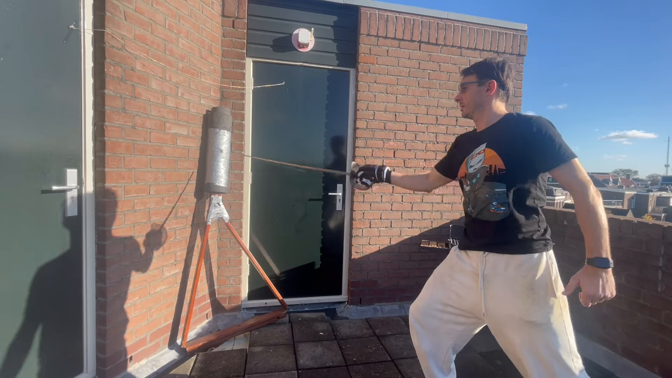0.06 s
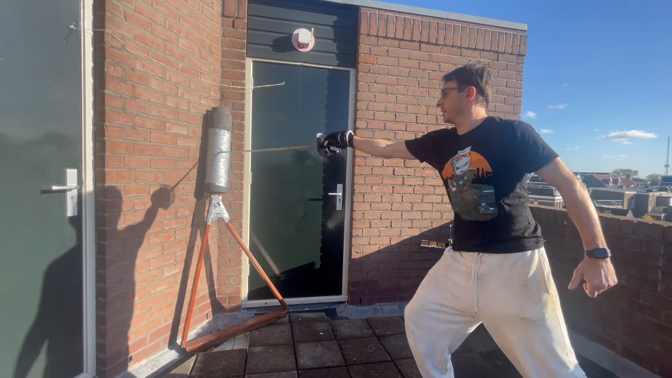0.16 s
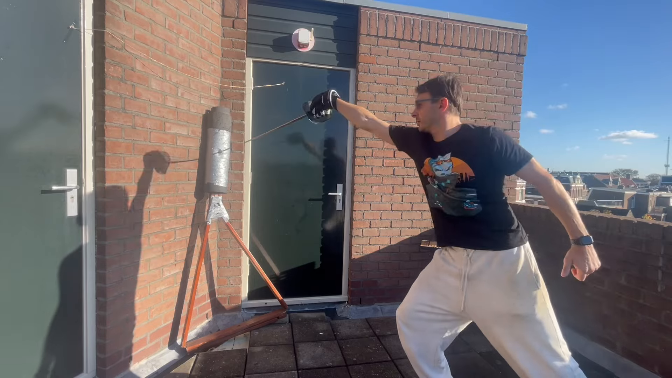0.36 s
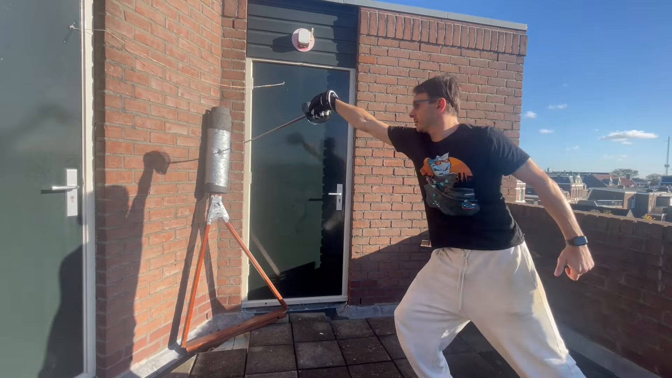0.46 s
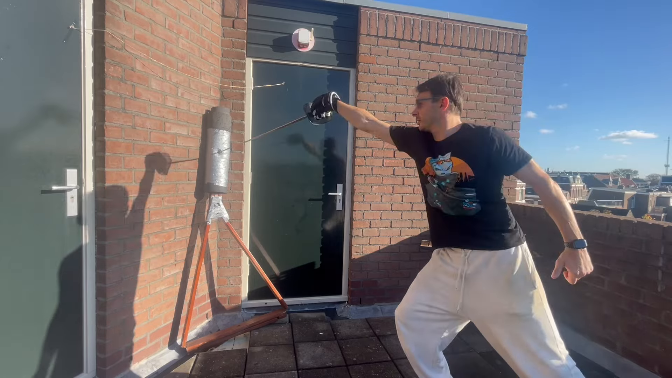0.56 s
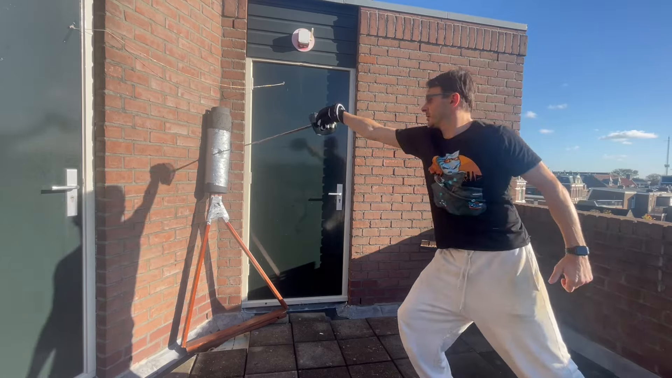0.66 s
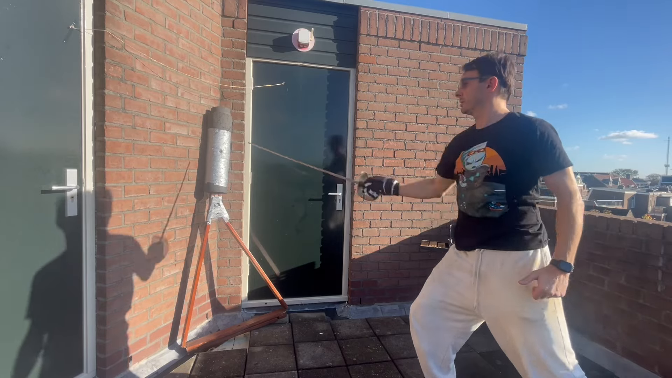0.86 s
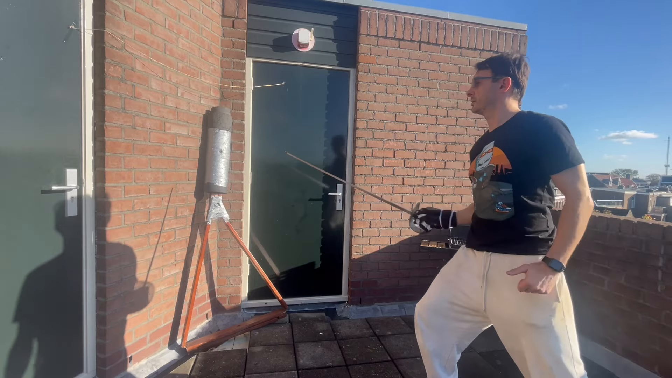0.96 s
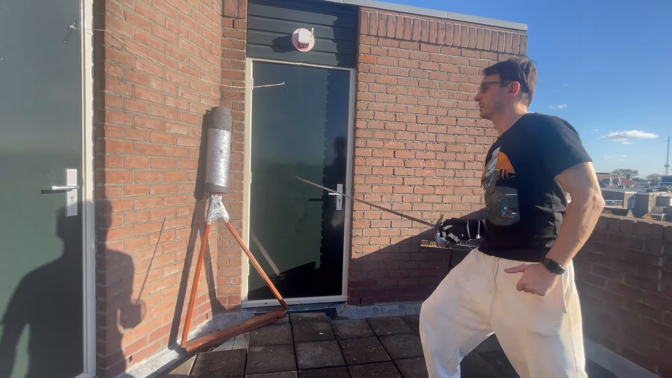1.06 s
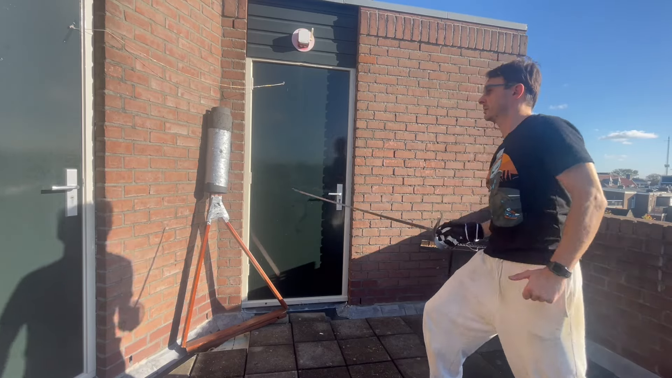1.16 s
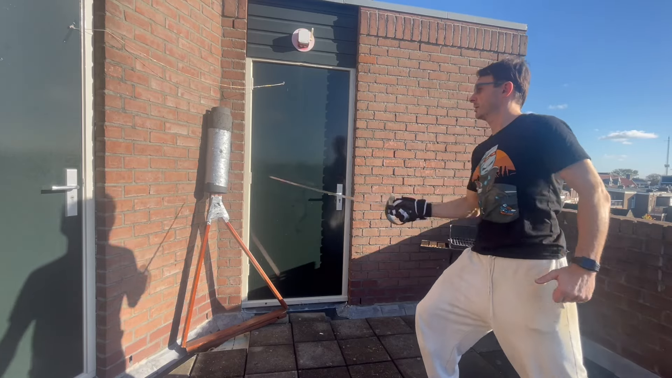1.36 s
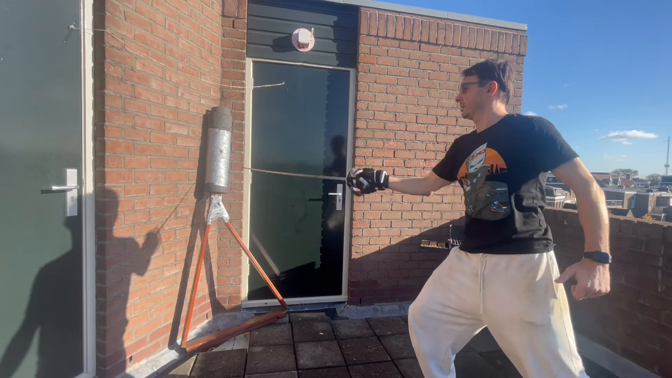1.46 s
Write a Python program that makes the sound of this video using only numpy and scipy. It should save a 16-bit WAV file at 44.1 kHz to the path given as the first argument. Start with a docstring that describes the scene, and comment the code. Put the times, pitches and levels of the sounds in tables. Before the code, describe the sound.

A blade tip knocks hard once into a padded post, with a short rattle, outdoors

```python
"""City rumble and thin electric tones lie under everything: shaped noise, a wavering low drone and sines.
Cloth rustles as the arm goes out and returns: grainy noise with short scuffs, ticks and whistles.
A blade tip is thrust once into a padded post on a wooden stand, on a brick-walled roof terrace: a soft
touch, a hard knock and a rattle, made of decaying modes and noise, with an echo of fading noise.
Two microphone ports take it in with differing phase and level."""
import sys
import numpy as np
from scipy import signal
from scipy.fft import rfft, irfft, next_fast_len
from scipy.io import wavfile
from scipy.ndimage import uniform_filter1d, map_coordinates

SR = 44100
rng = np.random.default_rng(int(sys.argv[2]) if len(sys.argv) > 2 else 0)


def generate_wav(sig):
    """Save sig (samples, or channels by samples) to the path in sys.argv[1] as 16-bit PCM at SR."""
    pcm = np.round(np.clip(np.atleast_2d(sig).T, -1, 1) * 32767).astype(np.int16)
    wavfile.write(sys.argv[1], SR, pcm)


N = 66150
T = np.arange(N) / SR  # time of each sample, s


def amp(db):
    """Gain of a level in dB."""
    return 10 ** (np.asarray(db) / 20)


def unit(x):
    """The signal scaled to rms 1."""
    return x / np.sqrt(np.mean(x ** 2) + 1e-20)


def along(points, hz):
    """Value at hz, read between (f/Hz, value) points on a log frequency axis."""
    f, value = np.transpose(points)
    return np.interp(np.log(hz + 1), np.log(f + 1), value)


def curves(rows):
    """One value per sample for each column after the time."""
    s, *columns = np.transpose(rows)
    return [np.interp(T, s, column) for column in columns]


def wobble(rate):
    """A smooth random curve with rate knots a second."""
    knots = rng.standard_normal(int(N * rate / SR) + 4)
    return map_coordinates(knots, [T * rate])


def filtered(x, response, ends="even"):
    """x times a complex response of frequency, its ends mirrored so that they do not click."""
    edge = 4096  # samples
    size = next_fast_len(N + 2 * edge)
    wide = np.pad(x, ((0, 0), (edge, edge)), mode="reflect", reflect_type=ends)
    spectrum = rfft(wide, size) * response(np.fft.rfftfreq(size, 1 / SR))
    return irfft(spectrum, size)[:, edge:edge + N]


def shape(spectrum):
    """Gain curve of a spectrum that falls 40 dB in the octave beyond each end."""
    low, high = spectrum[0], spectrum[-1]
    points = [(low[0] / 2, low[1] - 40)] + list(spectrum) + [(high[0] * 2, high[1] - 40)]
    return lambda hz: amp(along(points, hz))


def pair(alike, patchy_db=0):
    """White stereo noise of a given left-right likeness, with patches of random gain."""
    bins = signal.stft(rng.standard_normal((2, N)), nperseg=512)[2]
    patches = uniform_filter1d(rng.standard_normal(bins.shape[1:]), 5, 0)
    patches = unit(uniform_filter1d(patches, 12, 1))
    noise = signal.istft(bins * amp(patchy_db * patches), nperseg=512)[1][:, :N]

    def mid_side(hz):
        angle = np.arccos(np.clip(along(alike, hz), -1, 1)) / 2
        return np.array([np.cos(angle), np.sin(angle)])
    mid, side = filtered(noise, mid_side)
    return unit(np.array([mid + side, mid - side]))


# left-right likeness of city and cloth noise: f/Hz, likeness (1 = identical)
FAR_ALIKE = [(60, 1), (200, 0.76), (500, 0.67), (800, 0.1), (1200, 0.11), (8500, 0.1), (9800, 0.91),
             (12000, 0.67), (13200, .99)]
# colour of the city bed: f/Hz, relative level/dB per Hz
CITY_SPECTRUM = [(20, -22.5), (53, -4), (103, -5.5), (140, -11), (280, -17), (420, -23.5), (724, -24),
                 (1370, -29), (2200, -40), (3170, -52), (5500, -60), (7290, -59), (8150, -52),
                 (9000, -58.5), (10200, -60), (12500, -64), (14000, -62), (15500, -95)]
# path of the low drone: t/s, f/Hz, level/dB
DRONE_PATH = [(.4, 80.05, -70), (.55, 100.2, -60.5), (.9, 95.1, -56.5), (1.03, 93.25, -62.5),
              (1.22, 101.1, -48.5), (1.5, 93, -56)]
# thin tones: f/Hz, level/dB, right quieter/dB, right ahead/rad
THIN_TONES = [(581.4, -65, 0, 0), (7763, -97, 3, 2), (7946.5, -83.5, -2.5, 3), (8038, -86.5, 6, 4)]
CITY_DB, CITY_PATCHY_DB = -49, 2


def city():
    """Distant rumble and hiss as shaped noise, a drone of wavering pitch and level, and near-steady sines."""
    noise = unit(filtered(pair(FAR_ALIKE, CITY_PATCHY_DB), shape(CITY_SPECTRUM)))
    far = amp(CITY_DB + 0.57 * wobble(9.3)) * noise
    hz, db = curves(DRONE_PATH)
    drone_gain = np.sqrt(2) * amp(db + 2.8 * wobble(21.77))  # sqrt(2): levels are rms
    drone_phase = 2 * np.pi * np.cumsum(hz * (1 + 0.131 * wobble(20))) / SR
    out = far + drone_gain * np.sin(drone_phase)
    right_only = np.array([[0], [1]])
    starts = rng.uniform(0, 2 * np.pi, len(THIN_TONES))
    for (f, level, quieter, ahead), start in zip(THIN_TONES, starts):
        gain = np.sqrt(2) * amp(level + 0.36 * wobble(23.0) - right_only * quieter)
        out = out + gain * np.sin(2 * np.pi * f * T + start + right_only * ahead)
    return out


# swell of the rustle: t/s, level/dB, extra treble/dB
RUSTLE_SWELL = [(0, -93, 13), (.12, -77.5, 4), (.183, -67, -6.5), (.19, -63.5, 3.5), (.215, -46, -14.5),
                (.27, -61, -6), (.34, -70, -2.5), (.37, -95, 12), (.69, -100, 13), (.72, -69.5, -6),
                (.8, -75, 2.5), (.88, -69, -3.5), (.975, -65, -3), (1.03, -67, -4), (1.1, -74.5, -1.5),
                (1.3, -89.5, 0.5), (1.5, -81.5, 7)]
# body of the rustle: f/Hz, relative level/dB
CLOTH_BODY = [(1500, 8.5), (2500, 2), (3500, -2.5), (6000, -13), (8000, -16.5)]
# treble of the rustle: f/Hz, relative level/dB
CLOTH_SHEEN = [(8000, -11), (9800, -8), (12500, -5), (14000, -13), (15000, -18)]
# scuffs, ticks and whistles of cloth and blade: t/s, level/dB, centre f/Hz, width/octaves, length/s
CLOTH_TICKS = [(0.046, -75.5, 3760, 0.27, 0.0057), (0.146, -72.5, 3200, 0.08, 0.09),
               (0.592, -79, 11000, 0.45, 0.013), (0.711, -71, 11900, 0.27, 0.0033),
               (0.705, -70.5, 4800, .7, 0.023), (0.76, -69, 9000, 0.5, .012),
               (0.778, -72, 3620, 0.33, 0.011), (1.026, -75, 3200, 0.08, .025),
               (0.84, -75, 11800, 0.3, 0.028), (0.88, -66.5, 2530, 0.5, 0.018),
               (1.18, -85.5, 4260, 0.036, 0.033)]
GRAIN_DB = 0.5


def cloth():
    """Rubbing cloth as noise with a fast random grain, and short band-limited bursts."""
    level_db, treble_db = curves(RUSTLE_SWELL)
    noise = pair(FAR_ALIKE, patchy_db=1.5)
    body, sheen = filtered(noise, shape(CLOTH_BODY)), filtered(noise, shape(CLOTH_SHEEN))
    grain = amp(level_db + GRAIN_DB * wobble(180))
    out = grain * (body + amp(treble_db) * sheen) / np.std(body)
    snap = pair(FAR_ALIKE)
    for s, db, centre, octaves, length in CLOTH_TICKS:
        bell = lambda hz: np.exp(-.5 * (np.log2((hz + 1) / centre) / octaves) ** 2)
        band = unit(filtered(snap, bell))
        u = np.clip((T - s) / length, 0, None)
        burst = np.e * 2 * u * np.exp(-2 * u)  # peaks at 1, half a length after its start
        out = out + amp(db) * burst * band
    return out


# contacts of tip, post and stand: t/s, level/dB, hardness/dB per octave
TIP_CONTACTS = [(0.203, -36, 1.5), (0.2055, -34.5, -2), (.2108, -39.5, 9), (0.2162, -39, -0.5),
                (0.2292, -30.5, 13.5), (0.2309, -20.5, 3.5), (0.234, -22.5, 6.5), (0.2368, -18.5, 7),
                (0.2426, -39.5, 2), (0.2474, -35.5, 0), (.2527, -30.5, 8.5), (0.259, -34, 7.5),
                (0.2658, -29.5, 4), (.2790, -43, 2), (0.2886, -38.5, 1), (0.298, -43, 3.5)]
# modes of post and stand: f/Hz, relative level/dB, t60/s
POST_MODES = [(196.4, 5, 0.12), (214, -2.5, 0.097), (342, -2.5, 0.067), (390, -2, 0.077), (560, 0, 0.019),
              (732, 2, 0.03), (1040, 2.5, 0.017), (1210, -1, 0.042), (1340, -0.5, 0.042), (1874, -9, 0.03),
              (2092, -9, 0.056), (2382, -13.5, 0.036), (3605, -15, 0.012), (4520, -31.5, 0.0067)]
# colour of the crunch: f/Hz, relative level/dB
CRUNCH_SPECTRUM = [(150, 0), (500, 5.5), (1300, 5), (2400, -7.5), (3800, -14), (6000, -27), (9500, -37),
                   (12500, -38), (15500, -66)]
# left-right likeness of crunch and echo: f/Hz, likeness (1 = identical)
NEAR_ALIKE_POINTS = [(200, 0.75), (2800, 0.62), (4000, 0.35), (8500, 0.24), (10000, 0.55), (13000, .99)]
# balance of the hit: f/Hz, left over right/dB
POST_BALANCE = [(150, 1), (350, 0), (2000, 0)]
CRUNCH_DB, CRUNCH_T60_S = -2.5, 0.055  # noise level relative to its contact
SPREAD_DB, SPREAD_RAD = 4, 0.66  # scale of random left-right difference of a mode
PIVOT_HZ = 1357  # hardness tilts the modes about this
RISE_S, RISE_CYCLES = 0.001, 0.46  # rise of crunch and of modes
SCATTER_DB = 1.5  # random level of a mode from contact to contact


def thrust():
    """Every contact rings the post and crunches its padding; harder contacts are brighter."""
    ring, crunch_power = np.zeros((2, N + SR)), np.zeros(N + SR)
    t = np.arange(SR // 3) / SR
    hz, level, t60 = np.transpose(POST_MODES)[:, :, None]
    side = np.array([.5, -.5])[:, None, None]  # left, right
    apart = side * np.clip(hz / PIVOT_HZ, 0, 1)  # low modes reach both ports alike
    rise = 1 - np.exp(-t / RISE_S)
    swell = 1 - np.exp(-t * hz / RISE_CYCLES)  # low modes take longer to build up
    scatter = rng.standard_normal((len(TIP_CONTACTS), 3, len(POST_MODES), 1))
    for (s, db, hard), (size, pan, turn) in zip(TIP_CONTACTS, scatter):
        start = round(s * SR)
        mode_db = db + level + hard * np.log2(hz / PIVOT_HZ)
        mode_db = mode_db + SCATTER_DB * size + SPREAD_DB * apart * pan
        wave = np.sin(2 * np.pi * hz * t + SPREAD_RAD * apart * turn)
        modes = swell * amp(mode_db - 60 * t / t60) * wave
        ring[:, start:start + len(t)] += np.sum(modes, axis=1)
        crunch_gain = rise * amp(db + CRUNCH_DB - 60 * t / CRUNCH_T60_S)
        crunch_power[start:start + len(t)] += crunch_gain ** 2
    noise = unit(filtered(pair(NEAR_ALIKE_POINTS), shape(CRUNCH_SPECTRUM)))
    hit = ring[:, :N] + np.sqrt(crunch_power[:N]) * noise
    return filtered(hit, lambda f: amp(side[:, 0] * along(POST_BALANCE, f)))


# decay of the echo: f/Hz, t60/s
WALL_DECAY = [(150, 0.23), (1000, 0.15), (4000, 0.07), (12000, 0.1)]
WALL_DB, WALL_DELAY_S = -15, 0.0068


def walls(x):
    """The brick walls answer with a delayed noise tail; each frequency dies at its own speed."""
    hz, t, bins = signal.stft(pair(NEAR_ALIKE_POINTS)[:, :SR // 2], SR, nperseg=256)
    decay = amp(-60 * t / along(WALL_DECAY, hz)[:, None])
    tail = signal.istft(bins * decay, SR, nperseg=256)[1]
    tail = tail / np.linalg.norm(tail[0])
    late = np.pad(x, ((0, 0), (round(WALL_DELAY_S * SR), 0)))
    return amp(WALL_DB) * signal.fftconvolve(late, tail, axes=1)[:, :N]


def scene():
    """City and cloth, with the thrust and its echo."""
    hit = thrust()
    return city() + cloth() + hit + walls(hit)


# phase between the ports: f/Hz, right lag/rad
RIGHT_LAG = [(50, .15), (150, .25), (330, 0), (520, 1.8), (750, 2.3), (1500, 2.6), (2200, 3.3), (9800, 3.0),
             (11000, 2.2), (12300, .5), (13000, 0)]
# level between the ports: f/Hz, left over right/dB
LEFT_TILT = [(150, -3), (500, -1.5), (950, 3), (2000, 1), (3200, 4), (5500, 8), (7600, 11), (9000, 4),
             (9700, 0)]
TOP_HZ = 15700  # band limit


def record(dry):
    """Two ports with their own level and phase; nothing above the band limit."""
    def ports(hz):
        tilt = along(LEFT_TILT, hz) / 2
        left = amp(tilt)
        right = amp(-tilt) * np.exp(-1j * along(RIGHT_LAG, hz))
        return np.array([left, right]) * (hz < TOP_HZ)
    return filtered(dry, ports, "odd")


dry = scene()
out = record(dry)
generate_wav(out)
```